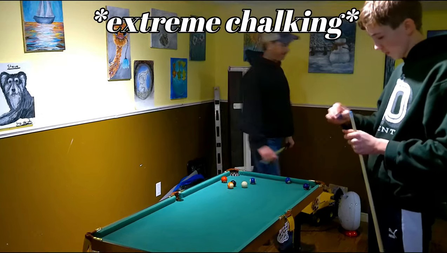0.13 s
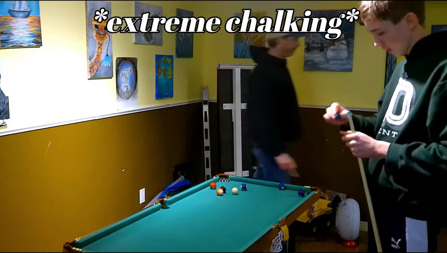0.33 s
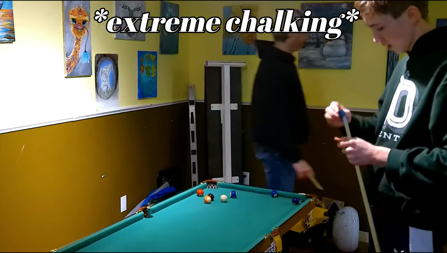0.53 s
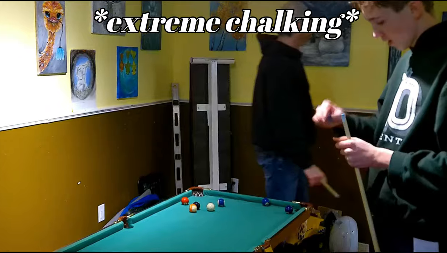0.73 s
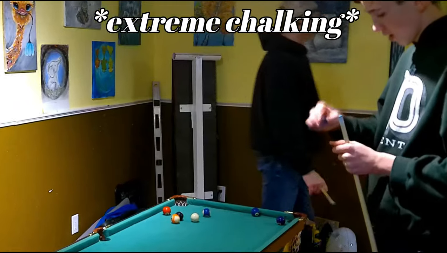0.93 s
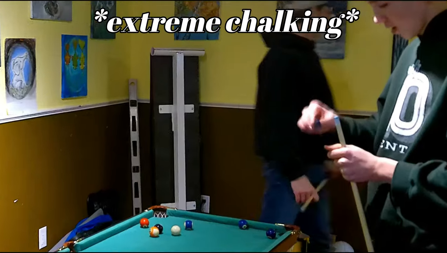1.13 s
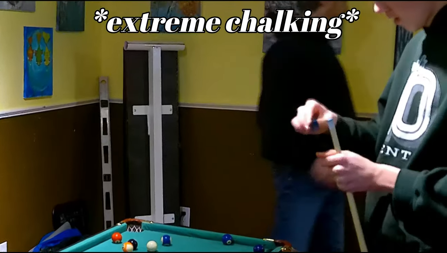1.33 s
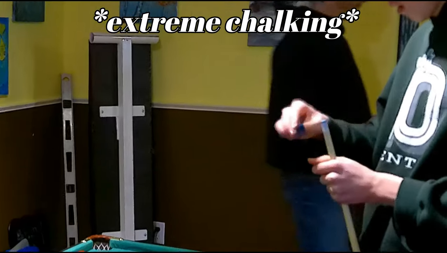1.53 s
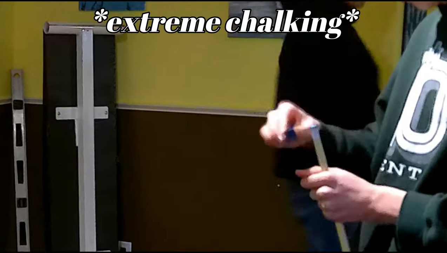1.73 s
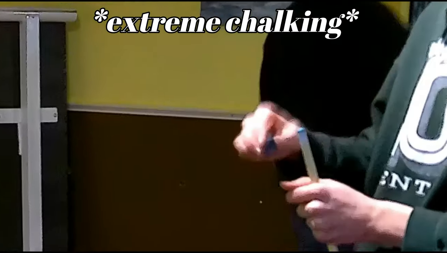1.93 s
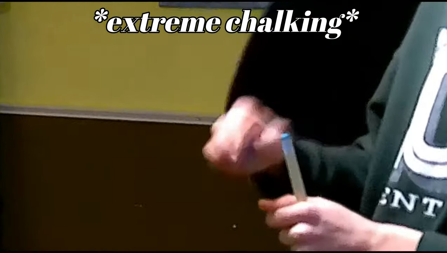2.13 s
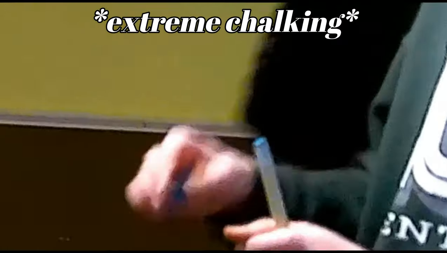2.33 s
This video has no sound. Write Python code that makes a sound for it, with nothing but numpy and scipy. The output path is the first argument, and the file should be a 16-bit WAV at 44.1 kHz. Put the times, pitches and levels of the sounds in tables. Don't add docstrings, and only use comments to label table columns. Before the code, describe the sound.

Fast, steady rubbing of chalk on a wooden cue tip, dry and raspy, in a lively room

```python
import sys
import numpy as np
from scipy import signal
from scipy.fft import rfft, irfft
from scipy.io import wavfile
from scipy.ndimage import uniform_filter1d

SR = 44100
rng = np.random.default_rng(int(sys.argv[2]) if len(sys.argv) > 2 else 0)


def amplitude_ratio(level_db):
    exponent = np.asarray(level_db, float) / 20
    return 10 ** exponent


def master_out(mix):
    frames = np.transpose(np.atleast_2d(mix))
    ceiling = np.clip(frames, -1, 1)
    pcm = np.round(ceiling * 32767).astype(np.int16)
    wavfile.write(sys.argv[1], SR, pcm)


N = 104605

# start in seconds, bite level in dB, slide peak in seconds after the
# bite, slide level in dB, shaft thump level in dB.
STROKES = [(-.004, -45.5, 0.009, -40, -56.5), (.192, -46.5, 0.056, -44, -46), (0.4, -46, 0.03, -45, -44),
           (.591, -39, 0.075, -46.5, -50), (.797, -39.5, 0.0053, -44.5, -45),
           (0.997, -33.5, 0.0067, -38.5, -42.5), (1.192, -37, 0.011, -44, -41.5),
           (1.39, -39.5, 0.046, -49.5, -43.5), (1.599, -38.5, 0.039, -44, -45.5),
           (1.801, -38.5, 0.033, -42, -40.5), (1.972, -54, 0.019, -49, -52),
           (2.002, -36, 0.0058, -38.5, -40.5), (2.186, -36.5, 0.028, -40.5, -39),
           (2.351, -42, 0.024, -51, -41.5)]
# pitch in Hz, width in Hz.
SHAFT_NOTES = [(1270, 60), (1350, 70), (1560, 60), (1630, 60), (1870, 70), (1955, 60), (2115, 70),
               (2370, 70), (2920, 80), (3190, 55), (3740, 70), (4660, 80), (4950, 80), (5560, 90)]
# frequency in Hz, level in dB.
BITE_COLOUR = [(250, -27.5), (450, -15.5), (900, 0.5), (1400, 3.5), (2300, 2.5), (3500, -9), (6500, -13.5),
               (14000, -59)]
SLIDE_COLOUR = [(500, -72), (1500, -14.5), (3300, 3), (5500, -0.5), (7500, -9), (10000, -13.5),
                (14000, -27)]
# middle in seconds, length in seconds, pitch in Hz.
SQUEALS = [(.02, .018, 3195), (.022, .016, 5520), (.44, .013, 3745), (.615, .01, 1875), (.814, .009, 3200),
           (1.21, .012, 3180), (1.635, .016, 3190), (1.64, .012, 3345), (2.225, .01, 3400),
           (1.025, .01, 1900)]
SQUEALS_DB = [-47.5, -45, -47, -43, -38, -40.5, -41, -59, -54, -38]
# middle in seconds, length in seconds, level in dB.
HUMS = [
    (1.042, 0.027, -46),
    (1.218, 0.026, -47.5),
    (2.025, 0.022, -51.5),
]
# middle in seconds, length in seconds, centre in Hz.
RETURNS = [(1.07, .03, 8500), (1.14, .04, 4500), (1.255, .016, 950), (.72, .04, 600), (1.72, .025, 1200),
           (.6, .006, 4500), (1.29, .025, 2500), (.842, .008, 3000), (.815, .008, 1500),
           (1.001, .005, 6000), (.802, .005, 6000)]
RETURNS_DB = [-60, -50.5, -43, -51.5, -51.5, -64, -54, -52, -38.5, -49, -53]
# start in seconds, level in dB, pitch in Hz, length in seconds.
STEPS = [
    (0.885, -48.5, 223, 0.046),
    (1.017, -49.5, 306, 0.11),
    (1.236, -40.5, 367, 0.052),
]
# frequency in Hz, time to fade by 60 dB in seconds.
ROOM_T60 = [(500, 0.69), (1500, 0.48), (4000, 0.6), (10000, 0.22)]
# frequency in Hz, level in dB.
AIR_COLOUR = [(20, -2.5), (100, -3.5), (250, -6.5), (500, -12), (1200, -15), (3000, -22.5), (7000, -29.5),
              (14000, -37.5)]
# frequency in Hz, difference against sum in dB.
PORTS = [(1500, -14), (3500, -36), (5500, -13), (8000, -3), (14000, -5)]
# delay after the main tick in seconds, height as a share of
# full scale, rise in seconds, fall in seconds.
TICKS = [
    (0, .017, .0009, .0015),
    (.0185, -.008, .001, .002),
    (.0305, -.0065, .0011, .0013),
]

GRIT_PER_S, GRIT_SPREAD_DB = 10000, 1.5
GRIP_WOBBLE_DB, GRIP_PER_S = 2.5, 157
BITE_ATTACK_S, BITE_HOLD_S, BITE_RELEASE_S = 0.00067, 0.027, 0.025
LANDING_DB, LANDING_S = 1.5, 0.006
SLIDE_ATTACK_S, SLIDE_RISE_S, SLIDE_FALL_S = 0.012, 0.029, 0.019
SLIDE_SMOOTH = 0.8
SHAFT_DB, SHAFT_SCATTER_DB, SHAFT_DETUNE = -9.5, 2.0, 0.004
THUMP_HZ, THUMP_WIDTH_HZ, THUMP_S = 612, 26, 0.015
THUMP_LOW_HZ, THUMP_LOW_WIDTH_HZ, THUMP_LOW_DB, THUMP_LOW_S = 555, 70, -1, 0.012
SQUEAL_WIDTH_HZ = 170
SQUEAL_BEAM = 0.6
RETURN_WIDTH = 0.8
ROOM_DB, ROOM_GAP_S = -6, 0.002
AIR_DB, AIR_WOBBLE_DB = -49, -0.5
PORT_DIRECT_DB, SIDE_PATCHY_DB, SIDE_PATCH_PER_S = -9.5, 5.5, 28
TICK_PERIOD_S, TICK_FIRST_S, TICK_SCATTER_DB = 0.050293, 0.0324, 1.3
OFFSET = 0.0282
TOP_HZ = 14250


def level(x, db):
    return x * amplitude_ratio(db) / np.sqrt(np.mean(x ** 2) + 1e-18)


def read(table, hz):
    t = np.array(table, float)
    return np.interp(np.log(np.maximum(hz, 1)), np.log(t[:, 0]), t[:, 1])


def colour(x, table):
    log_gain = read(table, np.fft.rfftfreq(2048, 1 / SR)) * np.log(10) / 20
    cepstrum = irfft(log_gain)
    cepstrum[1:1024] *= 2
    cepstrum[1025:] = 0
    return signal.fftconvolve(x, irfft(np.exp(rfft(cepstrum))))[:len(x)]


def ring(x, hz, width_hz):
    return signal.lfilter(*signal.iirpeak(hz, hz / max(width_hz, 25.), fs=SR), x)


def double_ring(x, hz, width_hz):
    return ring(ring(x, hz, width_hz), hz, width_hz)


def walk(rate, size):
    k = max(int(SR / rate), 2)
    smooth = uniform_filter1d(uniform_filter1d(rng.standard_normal(size), k), k)
    return smooth * np.sqrt(1.5 * k)


def swell(middle, length, db):
    t = np.arange(N) / SR
    return amplitude_ratio(db) * np.exp(-.5 * ((t - middle) / length) ** 2)


def grit(size):
    hit = rng.random(size) < GRIT_PER_S / SR
    strength = amplitude_ratio(GRIT_SPREAD_DB * rng.exponential(size=size)) * rng.standard_normal(size)
    grip = amplitude_ratio(GRIP_WOBBLE_DB * walk(GRIP_PER_S, size))
    return level(hit * strength * grip, 0)


def bite(t, db):
    shape = np.clip(t / BITE_ATTACK_S, 0, 1) * np.exp(-np.maximum(t - BITE_HOLD_S, 0) / BITE_RELEASE_S)
    landing = amplitude_ratio(LANDING_DB * np.exp(-np.abs(t) / LANDING_S))
    g = grit(len(t))
    return amplitude_ratio(db) * colour(g * shape * landing, BITE_COLOUR) / np.std(colour(g, BITE_COLOUR))


def slide(t, late, db):
    width = np.where(t < late, SLIDE_RISE_S, SLIDE_FALL_S)
    shape = np.clip(t / SLIDE_ATTACK_S, 0, 1) * np.exp(-.5 * ((t - late) / width) ** 2)
    g = grit(len(t)) + SLIDE_SMOOTH * rng.standard_normal(len(t))
    return amplitude_ratio(db) * colour(g * shape, SLIDE_COLOUR) / np.std(colour(g, SLIDE_COLOUR))


def shaft(drag, chance):
    out = 0
    for k, (hz, width) in enumerate(SHAFT_NOTES):
        loudness, detune = chance[k]
        note = ring(drag, hz * (1 + SHAFT_DETUNE * detune), width)
        out = out + (-1) ** k * 2 * amplitude_ratio(SHAFT_DB + SHAFT_SCATTER_DB * loudness) * note
    return out


def thump(t, lead, db):
    push = grit(len(t)) * np.clip(t / BITE_ATTACK_S, 0, 1) * np.exp(-np.maximum(t, 0) / THUMP_S)
    short_push = push * np.exp(-np.abs(t) / THUMP_LOW_S)
    out = ring(push, THUMP_HZ, THUMP_WIDTH_HZ)
    out = out + amplitude_ratio(THUMP_LOW_DB) * ring(short_push, THUMP_LOW_HZ, THUMP_LOW_WIDTH_HZ)
    return out * amplitude_ratio(db) / np.std(out[lead:lead + 1300])


def chalk(size=11025, lead=2205):
    out = np.zeros(N + size + 2 * lead)
    t = (np.arange(size) - lead) / SR
    for start, bite_db, late, slide_db, thump_db in STROKES:
        drag = bite(t, bite_db)
        chance = rng.standard_normal((len(SHAFT_NOTES), 2))
        drag = drag + slide(t, late, slide_db)
        i = int(round(start * SR)) + lead
        out[i:i + size] += drag + shaft(drag, chance) + thump(t, lead, thump_db)
    return out[lead:N + 2 * lead]


def squeals():
    out = 0
    for (middle, length, hz), db in zip(SQUEALS, SQUEALS_DB):
        out = out + swell(middle, length, db) * level(ring(grit(N), hz, SQUEAL_WIDTH_HZ), 0)
    return out


def hums():
    loudness = sum(swell(*row) for row in HUMS)
    return loudness * level(ring(grit(N), THUMP_HZ, THUMP_WIDTH_HZ), 0)


def return_drags():
    out = 0
    for (middle, length, hz), db in zip(RETURNS, RETURNS_DB):
        out = out + swell(middle, length, db) * level(double_ring(grit(N), hz, hz * RETURN_WIDTH), 0)
    return out


def steps():
    t, out = np.arange(N) / SR, 0
    for start, db, hz, length in STEPS:
        shape = (t > start) * np.exp(-np.abs(t - start) / length)
        out = out + shape * level(double_ring(rng.standard_normal(N), hz, hz * .6), db)
    return out


def room(size=22050):
    t, out = np.arange(size) / SR, 0
    for hz in 250 * 2. ** np.arange(0, 6.5, .5):
        fade = amplitude_ratio(-60 * t / read(ROOM_T60, hz))
        out = out + level(ring(rng.standard_normal(size), hz, hz / 3), 0) * np.sqrt(hz) * fade
    out = out * np.clip(t / ROOM_GAP_S - .5, 0, 1)
    return out / np.sqrt(np.sum(out ** 2))


def air():
    return level(colour(rng.standard_normal(N), AIR_COLOUR) * amplitude_ratio(AIR_WOBBLE_DB * walk(24, N)), AIR_DB)


def ticks():
    t, out = np.arange(N) / SR, 0
    for after, height, rise, fall in TICKS:
        cycle = (t - TICK_FIRST_S - after) / TICK_PERIOD_S
        k = np.round(cycle)
        from_peak = (cycle - k) * TICK_PERIOD_S
        size = amplitude_ratio(TICK_SCATTER_DB * rng.standard_normal(64))[k.astype(int) + 2]
        rising = np.exp(-.5 * (from_peak / rise) ** 2)
        falling = np.exp(-np.abs(from_peak) / fall)
        out = out + height * size * np.where(from_peak < 0, rising, falling)
    return out


def patchy(x):
    out = 0
    for k, hz in enumerate(3000 * 1.16 ** np.arange(12)):
        patch = amplitude_ratio(SIDE_PATCHY_DB * walk(SIDE_PATCH_PER_S, N))
        out = out + (-1) ** k * double_ring(x, hz, hz / 5) * patch
    return out


def through(x, reflections):
    return signal.fftconvolve(x, reflections)[len(x) - N:len(x)]


def scene():
    x = chalk()
    sing = squeals()
    extras = hums() + return_drags() + (1 - SQUEAL_BEAM) * sing
    x = x + np.pad(extras, (len(x) - N, 0))
    mid = x[-N:] + SQUEAL_BEAM * sing + amplitude_ratio(ROOM_DB) * through(x, room()) + air() + steps()
    early = rng.standard_normal(1024) * np.exp(-np.arange(1024) / 250.)
    other = through(x, early / np.linalg.norm(early))
    side = amplitude_ratio(PORT_DIRECT_DB) * other + amplitude_ratio(ROOM_DB) * through(x, room()) + air()
    side = patchy(colour(side, PORTS))
    return np.array([mid + side, mid - side])


def roll_off(x):
    return signal.sosfilt(signal.butter(12, 14270, fs=SR, output="sos"), x)


def record(dry):
    cut = signal.sosfilt(signal.ellip(8, .3, 70, TOP_HZ, fs=SR, output="sos"), dry)
    return roll_off(cut + ticks() + OFFSET)


dry = scene()
out = record(dry)
master_out(out)
```